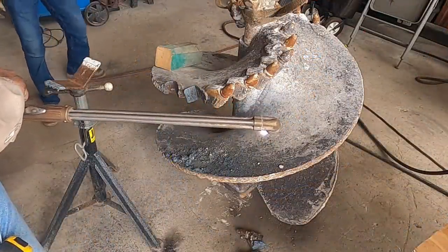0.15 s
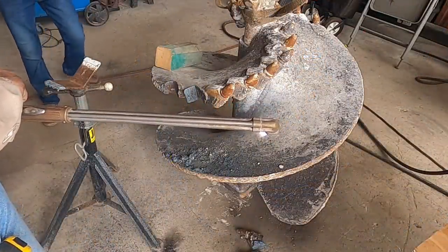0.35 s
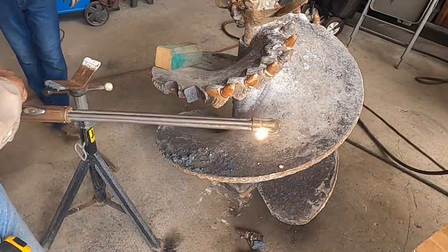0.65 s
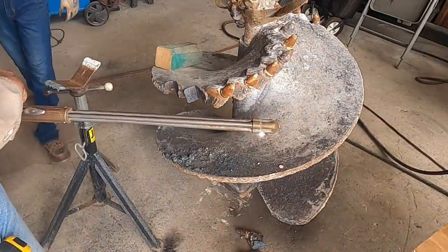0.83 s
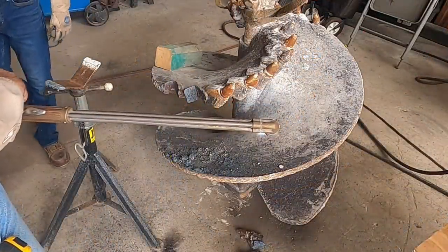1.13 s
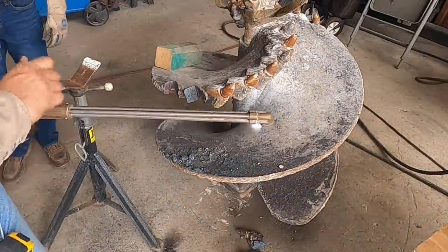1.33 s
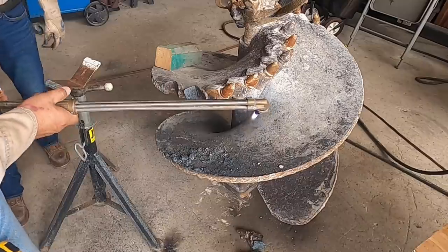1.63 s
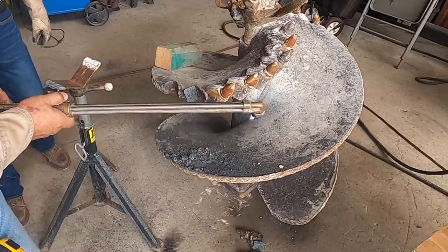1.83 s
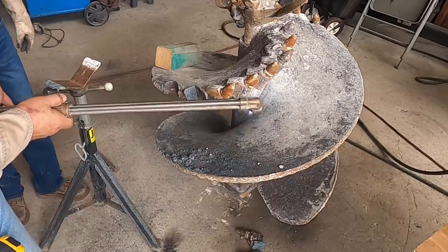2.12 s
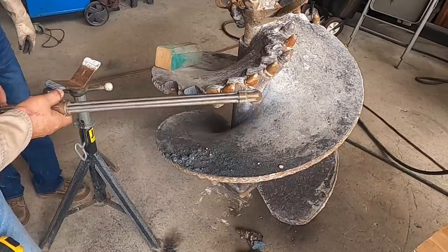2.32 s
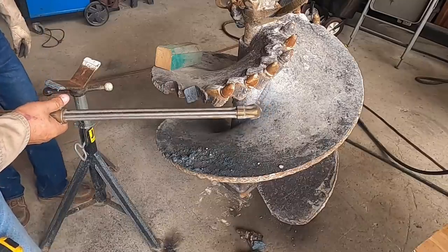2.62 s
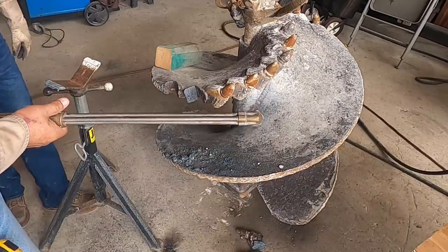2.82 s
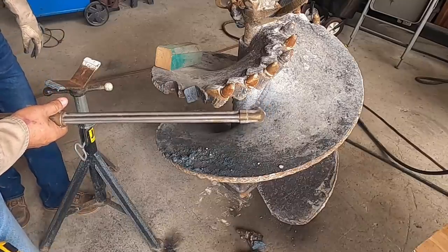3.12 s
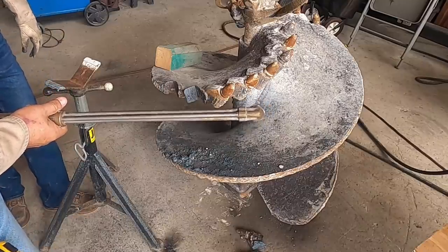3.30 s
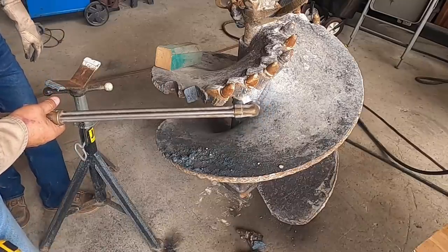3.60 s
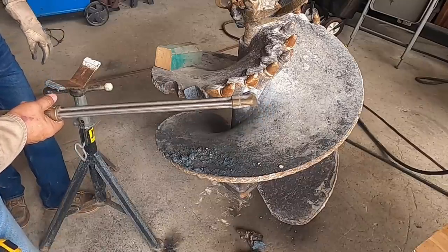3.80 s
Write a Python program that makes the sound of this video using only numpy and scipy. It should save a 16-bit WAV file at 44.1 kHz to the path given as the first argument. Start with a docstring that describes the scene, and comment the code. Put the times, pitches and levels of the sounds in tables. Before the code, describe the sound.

A cutting torch close up in a hard-floored metal shop: soft flame rumble and thin hiss with faint sputters, then two loud bursts of bright gas, each starting abruptly and closing with a roar, a third just beginning.

```python
"""A cutting torch burns over a steel auger in a metalworking shop: its oxygen jet is broad, bright noise that follows the lever.
The lever is pressed twice and starts to open again at the end; at part flow the flame pops and flares.
Under it the preheat flame roars and flutters as shaped noise on the steel, and the tip hisses with a floor echo.
A short whistle is a wandering sine and a tick is a burst of bright noise. The shop adds close reflections and a tail,
and a gain control ducks under the loud jet."""
import sys
import numpy as np
from scipy import signal
from scipy.fft import rfft, irfft, next_fast_len
from scipy.io import wavfile

SR = 44100
rng = np.random.default_rng(int(sys.argv[2]) if len(sys.argv) > 2 else 0)


def unload_wav(signal):
    """Save mono or channel-first audio to the path in sys.argv[1] as 16-bit WAV at rate SR, clipped to [-1, 1]."""
    wavfile.write(
        sys.argv[1],
        SR,
        np.round(np.clip(np.atleast_2d(signal).T, -1, 1) * 32767).astype(np.int16),
    )


N = 174195
TIME = np.arange(N) / SR
FFT_SIZE = next_fast_len(N + SR // 2, True)
FREQS = np.maximum(np.arange(FFT_SIZE // 2 + 1) * SR / FFT_SIZE, 1)
OCTAVES_HZ = 62.5 * 2. ** np.arange(9)


def from_db(db):
    """Decibels to amplitude gain."""
    return 10 ** (np.asarray(db) / 20)


def rms_one(x):
    """Scale to rms 1."""
    return x / np.sqrt(np.mean(x ** 2) + 1e-20)


def in_time(rows):
    """Each column of a breakpoint curve, read at every sample."""
    seconds, *columns = np.transpose(rows)
    return [np.interp(TIME, seconds, column) for column in columns]


def at_hz(points, hz):
    """Read a curve on a log-frequency axis."""
    point_hz, value = np.transpose(points)
    return np.interp(np.log(hz), np.log(point_hz), value)


def drift(corner_hz):
    """Random wander of spread 1: noise through two equal low-pass poles."""
    step = 40  # samples between the values computed
    pole = np.exp(-2 * np.pi * corner_hz * step / SR)
    settling = 2000
    white = rng.standard_normal(N // step + settling + 2)
    slow = signal.lfilter([1], [1, -2 * pole, pole * pole], white)[settling:]
    return np.interp(np.arange(N) / step, np.arange(len(slow)), rms_one(slow))


def noise(spectrum, peaks=()):
    """Turbulence with a given spectrum and resonances (Hz, width Hz, gain dB); rms 1."""
    db = at_hz(spectrum, FREQS)
    for hz, width_hz, gain_db in peaks:
        db = db + gain_db / (1 + (2 * (FREQS - hz) / width_hz) ** 2)
    white = rng.standard_normal(FFT_SIZE)
    return rms_one(irfft(rfft(white) * from_db(db))[:N])


def by_octave(x, gain_at):
    """Give each octave of a steady noise its own gain over time, with overlapping bands."""
    spectrum = rfft(x, FFT_SIZE)
    total = np.zeros(N)
    for hz, row in zip(OCTAVES_HZ, np.eye(len(OCTAVES_HZ))):
        share = np.interp(np.log(FREQS), np.log(OCTAVES_HZ), row)
        total += irfft(spectrum * share)[:N] * gain_at(hz)
    return total


def puff(start, attack, decay):
    """A quick rise to 1 and an exponential fall; all times in seconds."""
    age = np.maximum(TIME - start, 0)
    return np.minimum(age / attack, 1) * np.exp(-np.maximum(age - attack, 0) / decay)


def valve():
    """Oxygen flow (0-1) from the lever, with the level and brightness of the press under way."""
    # Each row: opens in s, time to full flow in s, starts closing in s, time to shut in s,
    # jet level offset in dB, brightness in dB per octave, level change while pressed in dB per s.
    presses = [(1.733, 0.049, 2.3164, 0.21, 3, 1, -8), (2.686, 0.085, 3.521, .21, -0.94, 0.5, -1.2),
               (3.921, 0.073, 4.3, .2, -1, 0, -1)]
    flow, level_db, bright = np.zeros((3, N))
    for opens, rise, closes, fall, db, tilt, sag in presses:
        opening = (TIME - opens) / rise
        closing = 1 - (TIME - closes) / fall
        press = np.clip(np.minimum(opening, closing), 0, 1)
        flow = np.maximum(flow, press)
        level_db = np.where(press > 0, db + sag * (TIME - opens), level_db)
        bright = np.where(press > 0, tilt, bright)
    return flow, level_db, bright


def oxygen_jet(flow, level_db, bright):
    """The jet's turbulence grows louder and brighter with flow; the treble needs the most flow."""
    # Jet spectrum at full flow. Each row: frequency in Hz, relative density in dB per Hz.
    jet_spectrum = [(60, -30), (130, -26.5), (250, -21), (350, -18.5), (500, -11), (700, -9), (1040, -4),
                    (1840, -4), (3050, -1.5), (3900, -2.5), (5280, -6.5), (6120, -6.5), (7250, -12),
                    (9540, -14.5), (11100, -21), (12600, -20.5), (15500, -33.5)]
    # Resonances of the jet on the steel. Each row: frequency in Hz, width in Hz, gain in dB.
    steel_peaks = [(1045, 59, 1), (2430, 66, 3), (3130, 81, 3), (3760, 110, 2.5), (5930, 86, 3.5),
                   (6260, 100, -0.5), (8370, 220, 3)]
    jet_db, flicker_db, rough_db = -12.5, 0.53, 0.32
    flow_power, power_per_octave = 1.03, 0.44

    def gain_at(hz):
        octave = np.log2(hz / 3000)  # brightness tilts around 3 kHz
        power = max(flow_power + power_per_octave * octave, .5)
        return flow ** power * from_db(bright * octave + flicker_db * drift(16))

    turbulence = by_octave(noise(jet_spectrum, steel_peaks), gain_at)
    return turbulence * from_db(jet_db + level_db + rough_db * drift(200))


def flare(flow):
    """At part flow the oxygen feeds the flame, which tears and roars."""
    # Flame spectrum before the low-pass. Each row: frequency in Hz, relative density in dB per Hz.
    flame_spectrum = [(35, -33), (60, -23), (180, -12.5), (300, -6.5), (500, -5), (770, -2), (1440, -3),
                      (2500, -9.5), (6000, -19), (12000, -21)]
    flare_db, opening_db, rough_db = -16, -5, 2.0  # weaker while the valve opens than while it shuts
    below_flow, edge = 0.92, .11  # it burns only below this flow, fading over the edge
    above_flow, dying_edge = .02, 0.29  # and dies when the valve is nearly shut
    flow_power = 0.37  # it grows with the flow, though less than in proportion
    upper_fade = (below_flow - flow) / edge
    lower_fade = (flow - above_flow) / dying_edge
    alight = np.clip(np.minimum(upper_fade, lower_fade), 0, 1)
    low_pass = signal.butter(2, 4500, fs=SR, output="sos")
    tearing = signal.sosfilt(low_pass, noise(flame_spectrum))
    level_db = flare_db + opening_db * (np.gradient(flow) > 0) + rough_db * drift(120)
    return tearing * alight * flow ** flow_power * from_db(level_db)


def pops():
    """Dull thuds of the flame, soft as it sputters on the steel, harder as the oxygen reaches it."""
    # Each row: start in seconds, level in dB.
    pop_times = [(0.404, -32), (0.447, -29.5), (0.502, -37), (0.533, -30), (.581, -34), (1.739, -26),
                 (2.689, -16.5), (3.926, -17.5)]
    # Thud spectrum. Each row: frequency in Hz, relative density in dB per Hz.
    thud_spectrum = [(60, -25), (180, -6.5), (380, -14), (1100, -7), (2000, -21.5), (5000, -42),
                     (15000, -70)]
    attack_s, decay_s = .002, 0.0065
    envelope = sum(from_db(db) * puff(start, attack_s, decay_s) for start, db in pop_times)
    return noise(thud_spectrum) * envelope


def squeal():
    """The tip squeals on the first press: an unsteady sine that leaps up as the pressure builds."""
    # Each row: time in seconds, centre pitch in Hz, mean level in dB.
    whistle = [(1.755, 3300, -54), (1.766, 2700, -15), (1.776, 2775, -17), (1.783, 3940, -11),
               (1.795, 4030, -13), (1.806, 4000, -17), (1.83, 3860, -45)]
    pitch_spread_hz, rough_db = 94, 2.3
    hz, db = in_time(whistle)
    sounding = (TIME > whistle[0][0]) & (TIME < whistle[-1][0])
    phase = 2 * np.pi * np.cumsum(hz + pitch_spread_hz * drift(317)) / SR
    return sounding * from_db(db + rough_db * drift(120)) * np.sin(phase)


def flame_roar():
    """The preheat flame rumbles on the steel as low noise; its bass flutters at a wandering rate."""
    # Each row: time in seconds, bass level in dB, middle level in dB, both before the offsets below.
    roar_level = [(0, -35, -46.5), (.2, -32.5, -41), (.42, -30.5, -41), (.58, -34, -44), (.7, -34, -47.5),
                  (.79, -36.5, -62), (.87, -37, -54.5), (.95, -33, -52.5), (1.08, -32, -45),
                  (1.15, -32.5, -37.5), (1.35, -31, -37.5), (1.7, -30.5, -34), (2.2, -35.5, -37.5),
                  (2.6, -32, -43.5), (3.3, -37, -44), (3.75, -27, -37.5), (3.9, -35.5, -37.5)]
    # Rumble spectrum before the low-pass. Each row: frequency in Hz, relative density in dB per Hz.
    roar_spectrum = [(15, -38), (25, -13), (45, -15.5), (65, -4.5), (100, -7.5), (200, -1.5), (240, 0),
                     (270, -6.5), (313, -3), (363, -10), (449, -4.5), (543, -14.5), (604, -9), (796, -14),
                     (905, -9), (1030, -16.5), (1980, -25), (4000, -37), (6000, -45), (10000, -70)]
    # Resonances. Each row: frequency in Hz, width in Hz, gain in dB.
    roar_peaks = [(314, 21, 2), (637, 35, 4)]
    # Each row: time in seconds, flutter depth in dB (negative turns the swing over).
    flutter_depth = [(0, -3), (.42, 4.2), (.75, -1.5), (1.1, -1.5), (1.4, -0.5), (3.9, 0)]
    bass_hz, middle_hz, top_hz = 253, 1300, 2600
    middle_offset_db, offset_db, rough_db, flicker_db = 9, -0.5, 1.0, .5
    flutter_hz, flutter_wander = 22.1, 0.147  # wander as a fraction of the rate

    bass_db, middle_db = in_time(roar_level)
    depth_db, = in_time(flutter_depth)
    rate_hz = flutter_hz * (1 + flutter_wander * drift(7.7))
    flutter_db = depth_db * np.sin(2 * np.pi * np.cumsum(rate_hz) / SR)

    def gain_at(hz):
        upper = np.clip(np.log(hz / bass_hz) / np.log(middle_hz / bass_hz), 0, 1)
        bass_part = (1 - upper) * (bass_db + flutter_db)
        middle_part = upper * (middle_db + middle_offset_db)
        return from_db(bass_part + middle_part + flicker_db * drift(15))

    low_pass = signal.butter(2, top_hz, fs=SR, output="sos")
    rumble = signal.sosfilt(low_pass, noise(roar_spectrum, roar_peaks))
    return by_octave(rumble, gain_at) * from_db(rough_db * drift(70) + offset_db)


def tip_hiss():
    """The preheat holes hiss, combed by a delayed copy off the floor."""
    # Each row: time in seconds, level in dB before the echo is added.
    tip_level = [(0, -47.5), (.5, -47), (.58, -47), (.66, -50.5), (.8, -51), (.95, -51), (1.05, -47),
                 (1.25, -45), (1.6, -47), (3.9, -50)]
    # Hiss spectrum. Each row: frequency in Hz, relative density in dB per Hz.
    tip_spectrum = [(400, -26), (900, -24), (1700, -8.5), (2400, 3), (2900, 0), (3600, -4), (4300, -4.5),
                    (4700, -1), (5100, -1.5), (5500, -8.5), (6300, -11.5), (7000, -11.5), (7600, -8),
                    (8300, -13.5), (10000, -17), (11700, -23.5), (13000, -22), (15500, -33)]
    # Resonances. Each row: frequency in Hz, width in Hz, gain in dB.
    tip_peaks = [(2880, 100, 3), (4630, 90, 0.5), (5030, 110, 3.5), (7620, 400, 2)]
    # Each row: time in seconds, delay of the floor echo in ms.
    floor_echo = [(0, 5.4), (1.3, 5.06), (1.7, 4.98), (3.9, 4.5)]
    echo_gain = 0.46
    level_db, = in_time(tip_level)
    delay_ms, = in_time(floor_echo)
    hiss = noise(tip_spectrum, tip_peaks) * from_db(level_db)
    return hiss + echo_gain * np.interp(TIME - delay_ms / 1000, TIME, hiss)


def spark():
    """One flake of scale ticks off: a tiny burst of bright noise."""
    # Tick spectrum. Each row: frequency in Hz, relative density in dB per Hz.
    tick_spectrum = [(2000, -15), (6000, -3), (11000, 3), (15500, -3)]
    start_s, attack_s, decay_s, level_db = 1.102, .001, .004, -51
    return noise(tick_spectrum) * from_db(level_db) * puff(start_s, attack_s, decay_s)


def shop(x):
    """Close reflections off the steel and the shop's tail, both decaying noise convolved with x."""
    # Each row: frequency in Hz, time to decay by 60 dB in seconds.
    decay_times = [(125, 0.41), (1000, 0.63), (4000, 0.61), (8000, 0.58), (15000, 0.48)]
    tail_db, tail_delay_s = -10.5, 0.0099
    early_db, early_start_s, early_attack_s, early_decay_s = -16, 0.0019, 0.003, 0.0067

    def decay_at(hz):
        return from_db(-60 * TIME / at_hz(decay_times, hz))

    tail = by_octave(rng.standard_normal(N), decay_at) * (TIME > tail_delay_s)
    high_pass = signal.butter(2, 900, "high", fs=SR, output="sos")
    early = signal.sosfilt(high_pass, rng.standard_normal(N))
    early = early * puff(early_start_s, early_attack_s, early_decay_s)
    response = from_db(tail_db) * rms_one(tail) + from_db(early_db) * rms_one(early)
    return signal.fftconvolve(x, response / np.sqrt(N))[:N]


def two_sides(x, jet):
    """Add scattered sound to one side and subtract it from the other; the top treble leans right."""
    # Scattered part of the whole sound. Each row: frequency in Hz, level in dB.
    width = [(500, -60), (1200, -53), (4400, -61.5), (6500, -39), (9000, -20.5), (10500, -20),
             (12000, -1.5), (15500, 0.5)]
    # Extra scattered part of the jet, widest in its low end. Each row: frequency in Hz, level in dB.
    jet_width = [(60, 1), (200, -1), (400, -11.5), (700, -18.5), (1000, -23.5), (1400, -54), (2400, -84)]
    # Each row: frequency in Hz, left minus right in dB.
    balance = [(9500, 0), (11000, 0), (12500, -6), (15000, -7)]
    scatter_s = 0.03  # decay time constant
    scatter = rms_one(rng.standard_normal(N) * np.exp(-TIME / scatter_s)) / np.sqrt(N)
    mid = rfft(x, FFT_SIZE)
    spread = mid * from_db(at_hz(width, FREQS))
    spread = spread + rfft(jet, FFT_SIZE) * from_db(at_hz(jet_width, FREQS))
    side = spread * rfft(scatter, FFT_SIZE)
    lean_db = at_hz(balance, FREQS) / 2
    left = irfft((mid + side) * from_db(lean_db))[:N]
    right = irfft((mid - side) * from_db(-lean_db))[:N]
    return np.array([left, right])


def scene():
    """The torch in the shop, on two channels."""
    flow, level_db, bright = valve()
    jet = oxygen_jet(flow, level_db, bright)
    flame = flare(flow) + pops() + flame_roar()
    torch = jet + flame + squeal() + tip_hiss() + spark()
    return two_sides(torch + shop(torch), jet)


def one_pole(x, seconds):
    """Smooth over a time constant."""
    pole = np.exp(-1 / (seconds * SR))
    return signal.lfilter([1 - pole], [1, -pole], x)


def record(dry):
    """Gain control turns loud sound down and recovers slowly; the extreme treble is cut."""
    threshold_db, slope = -23.5, 0.62  # slope: dB of cut per dB over the threshold
    release_db_per_s, attack_s, window_s = 19, 0.0017, 0.015
    cutoff_hz = 15800
    power = one_pole(np.mean(dry ** 2, axis=0), window_s)
    level_db = 10 * np.log10(power + 1e-12)
    wanted_cut_db = slope * np.maximum(level_db - threshold_db, 0)
    # A running maximum on a rising ramp lets the cut fall no faster than the release.
    release = release_db_per_s * TIME
    held_cut_db = np.maximum.accumulate(wanted_cut_db + release) - release
    cut_db = one_pole(held_cut_db, attack_s)
    low_pass = signal.ellip(12, .1, 80, cutoff_hz, fs=SR, output="sos")
    return signal.sosfilt(low_pass, dry * from_db(-cut_db))


dry = scene()
out = record(dry)
unload_wav(out)
```